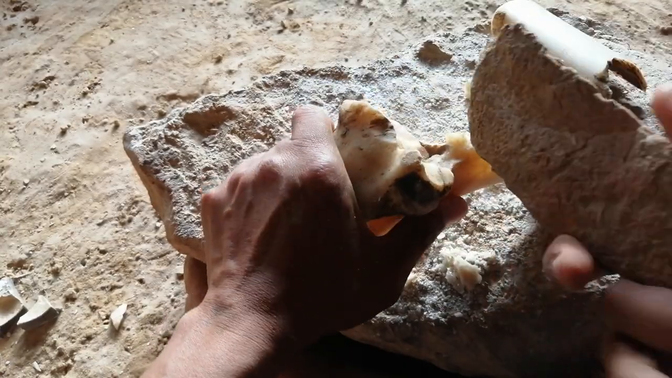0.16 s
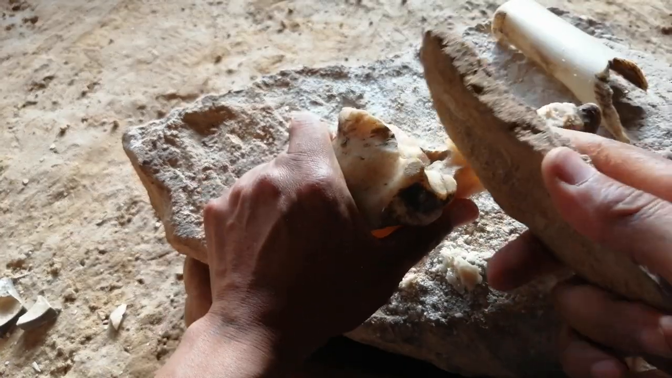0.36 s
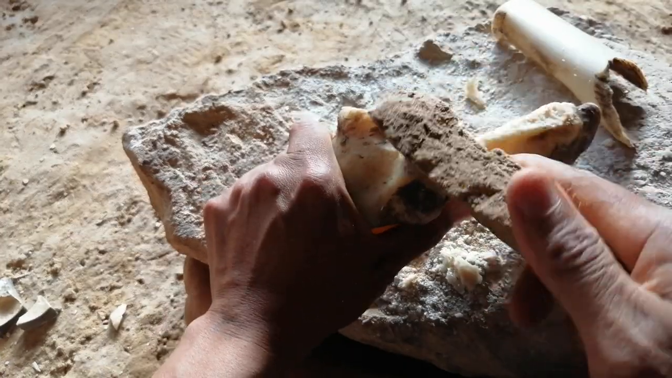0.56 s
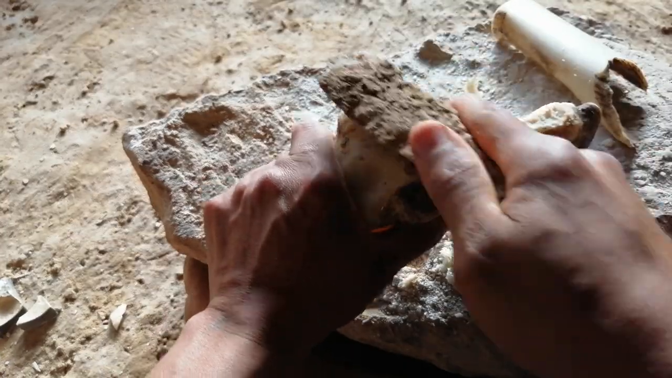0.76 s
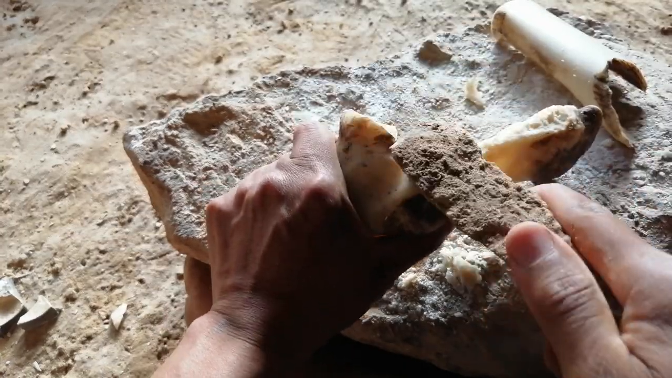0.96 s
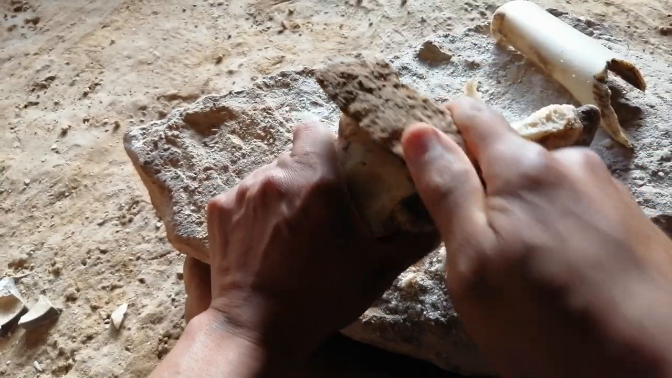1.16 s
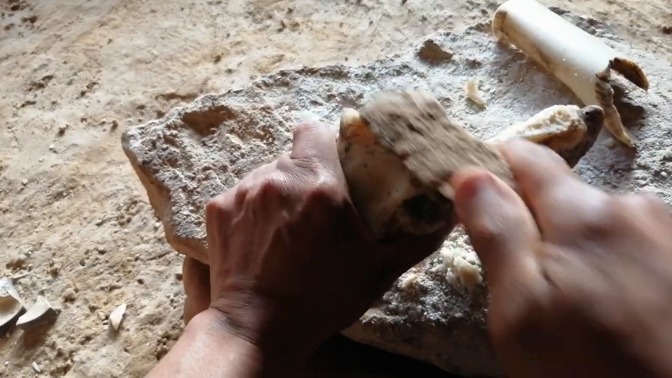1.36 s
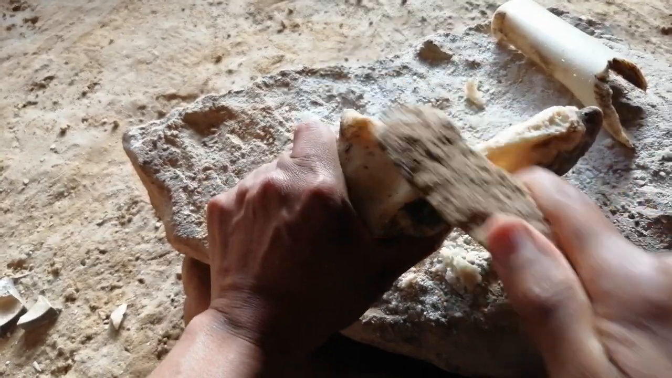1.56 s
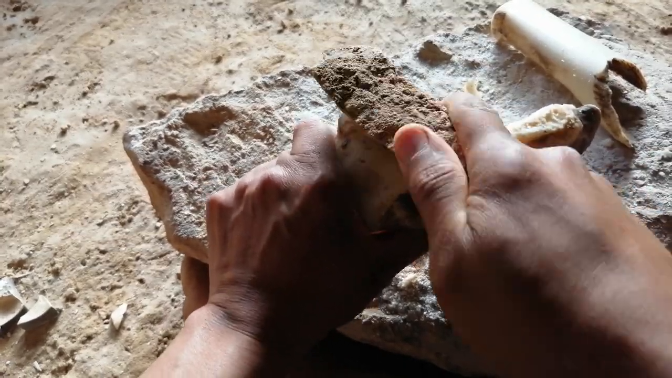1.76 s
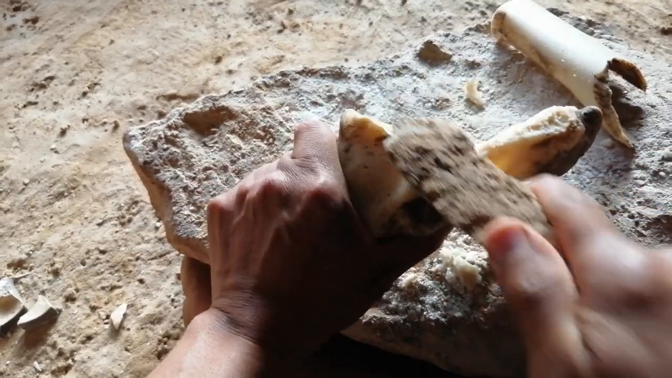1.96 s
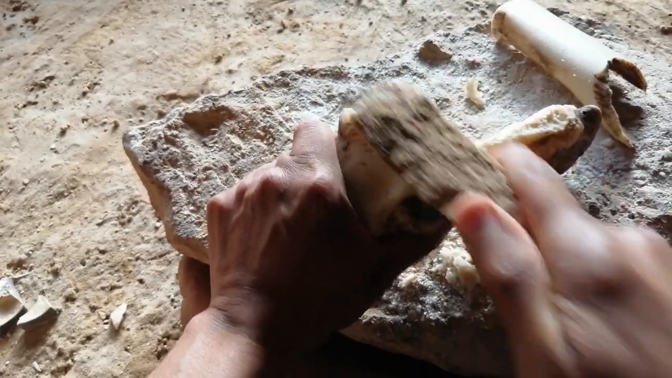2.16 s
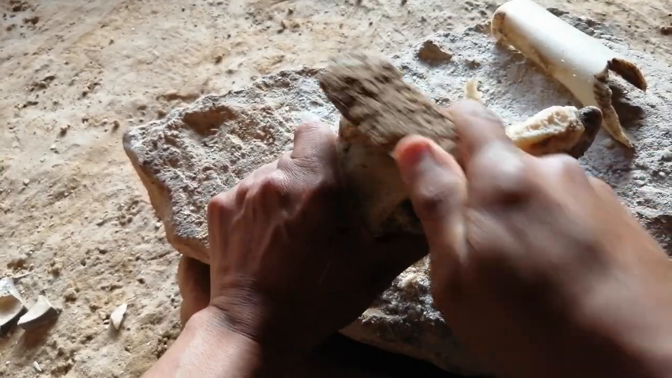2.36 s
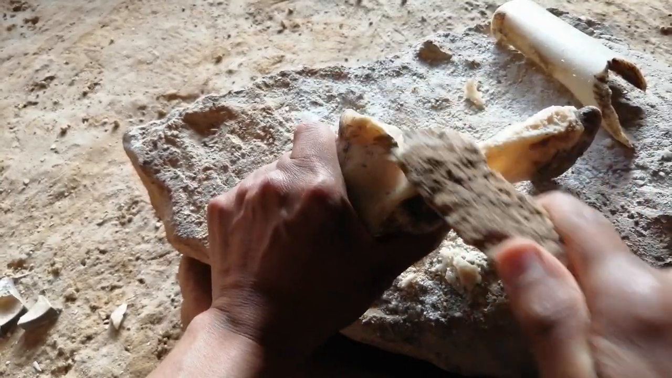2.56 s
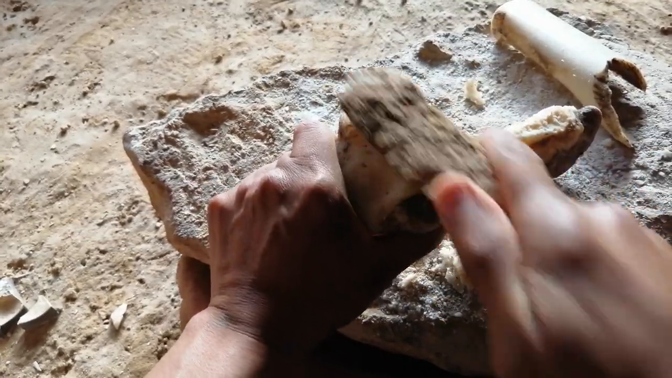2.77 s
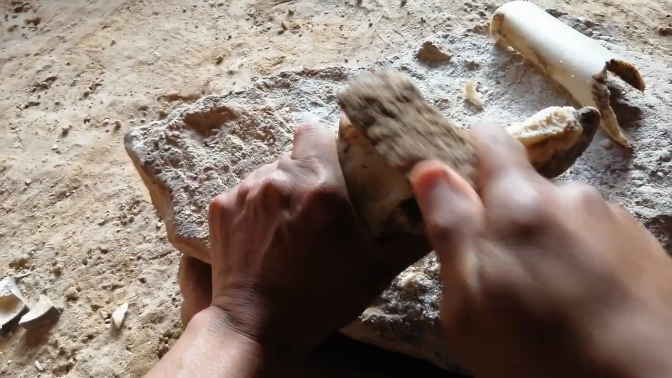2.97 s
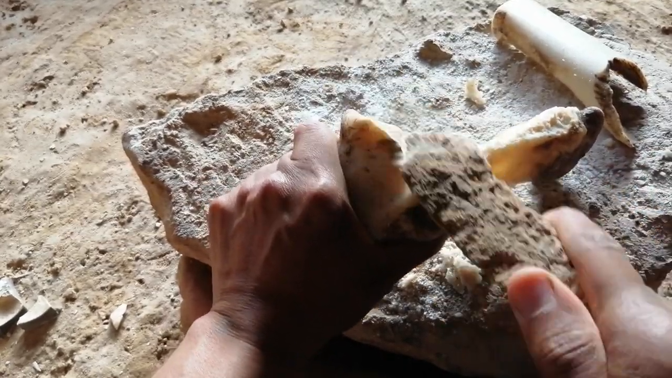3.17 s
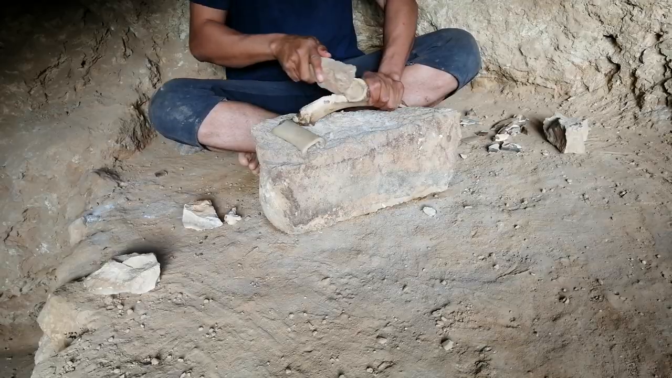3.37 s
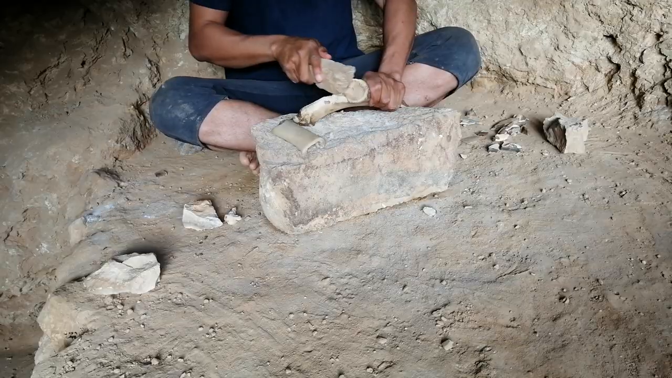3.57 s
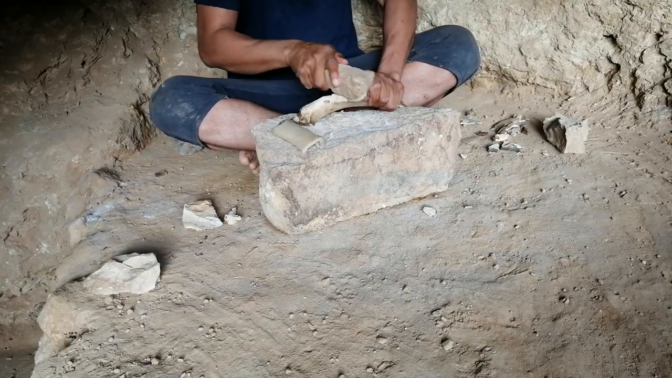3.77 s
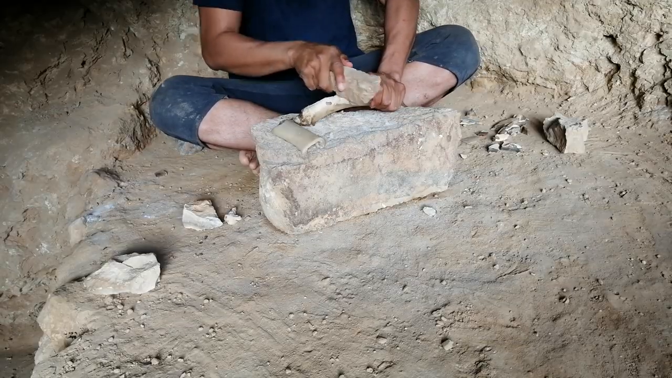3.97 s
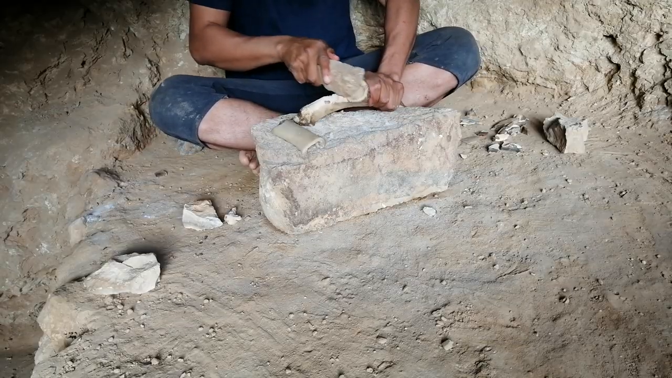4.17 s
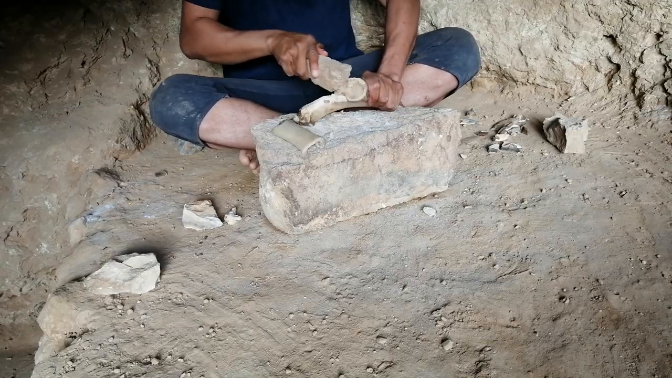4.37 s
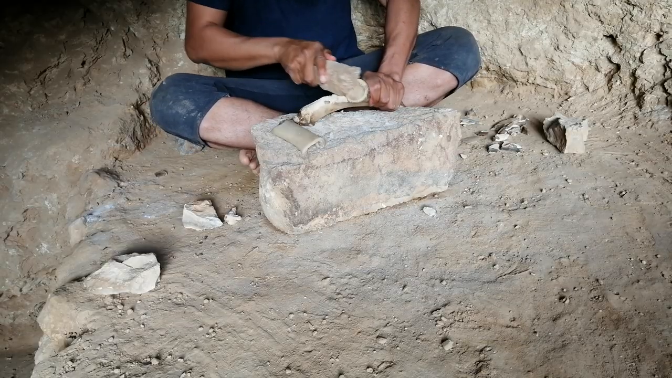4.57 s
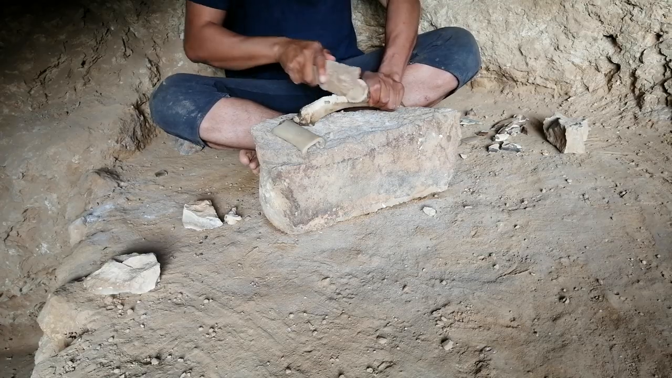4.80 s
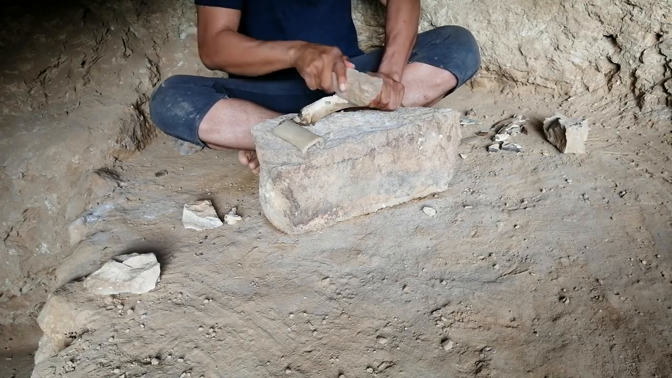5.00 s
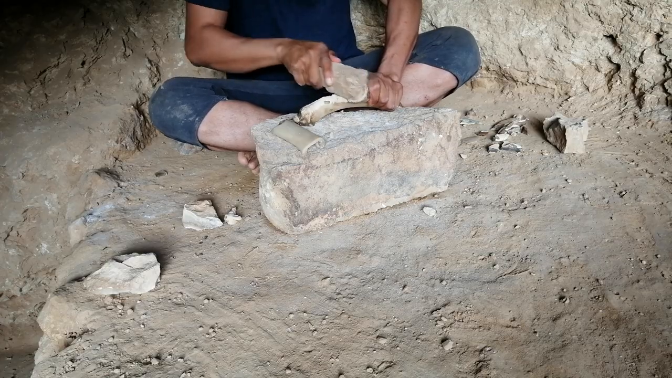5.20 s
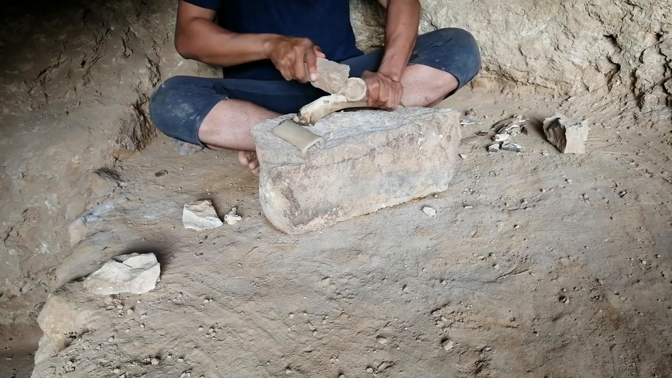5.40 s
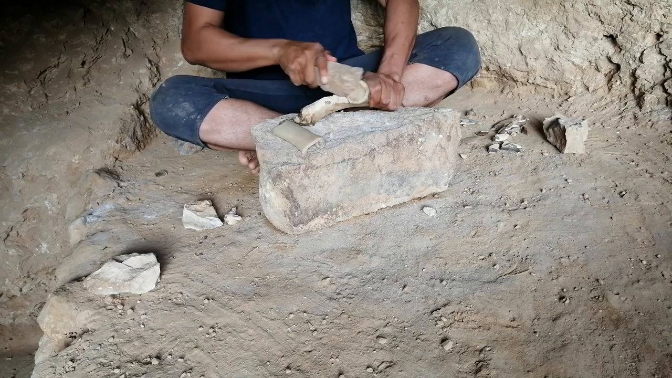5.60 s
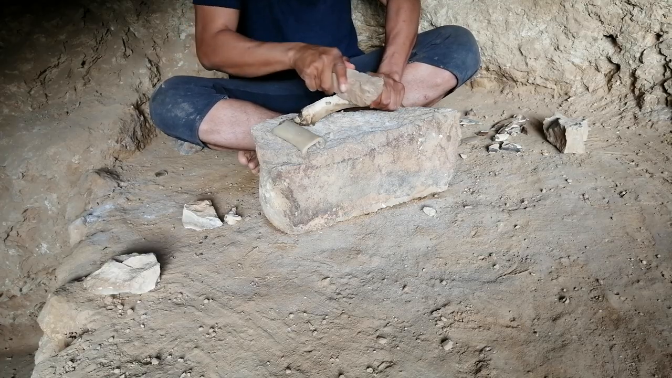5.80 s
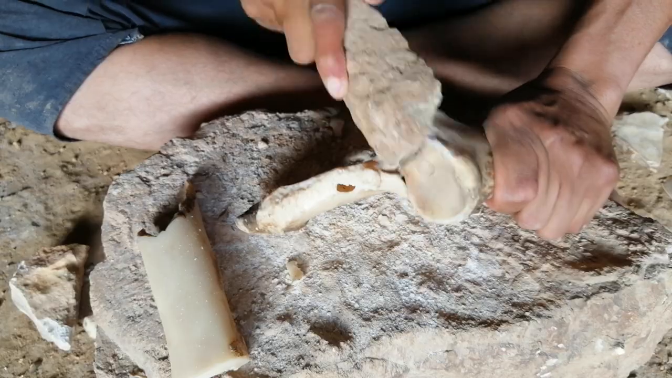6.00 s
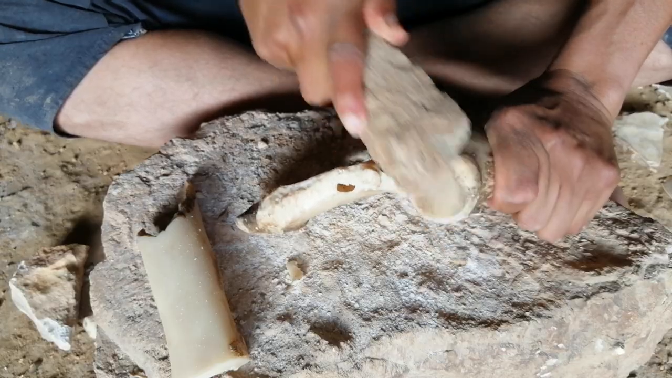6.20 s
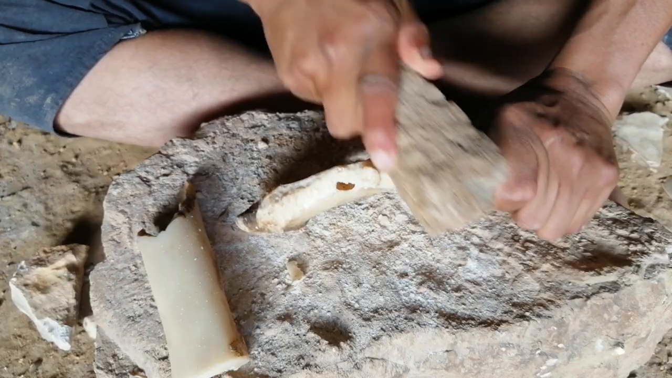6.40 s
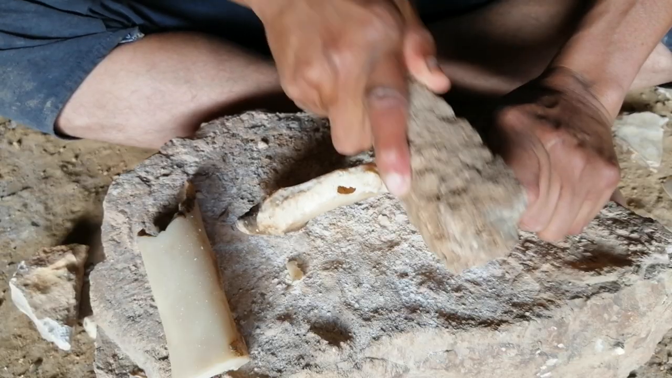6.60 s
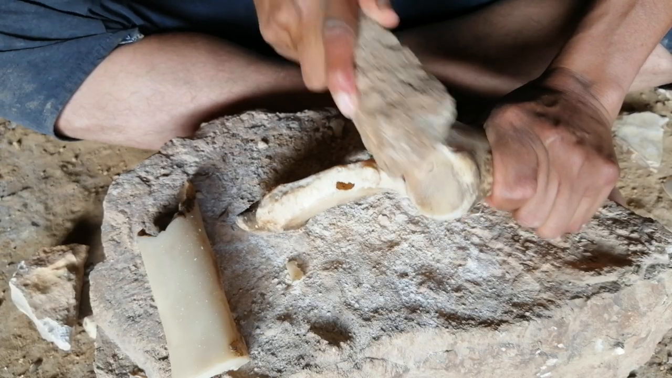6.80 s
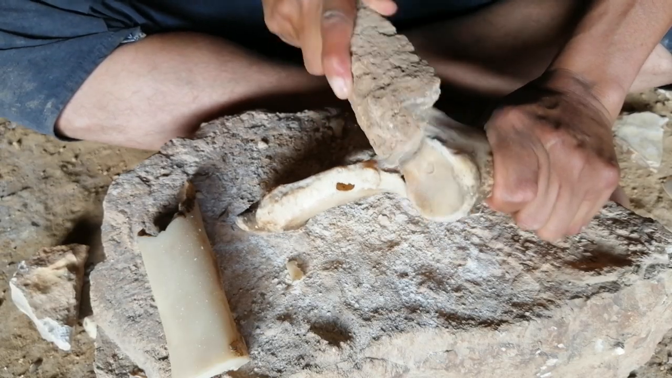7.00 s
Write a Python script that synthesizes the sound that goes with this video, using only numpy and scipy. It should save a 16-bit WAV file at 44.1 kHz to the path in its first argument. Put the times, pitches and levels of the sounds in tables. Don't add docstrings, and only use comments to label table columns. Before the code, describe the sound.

After a quick chirp and soft stone knocks, coarse dry scraping of stone on bone runs in steady, quick to-and-fro strokes inside a rock shelter.

```python
import sys
import numpy as np
from scipy import signal
from scipy.fft import rfft, irfft
from scipy.io import wavfile

SR = 44100
rng = np.random.default_rng(int(sys.argv[2]) if len(sys.argv) > 2 else 0)


def level_to_linear(level):
    exponent = np.asarray(level, float) / 20
    return 10 ** exponent


def dump_mix(stems):
    frames = np.atleast_2d(stems).T
    limited = np.clip(frames, -1, 1)
    pcm = np.round(limited * 32767).astype(np.int16)
    wavfile.write(sys.argv[1], SR, pcm)


N = 310905
T = np.arange(N) / SR

CUTS_S = [
    3.278,
    5.926,
]
# frequency in Hz, level in dB per Hz.
AIR_SPECTRUM = [(15, -30), (25, -6), (59, -7), (72, -9.5), (531, -28), (962, -28.5), (1650, -37),
                (2760, -30.5), (3920, -38), (5430, -31.5), (7510, -40.5), (14800, -40), (16000, -54)]
# peak time in seconds, peak level in dB.
GUSTS = [(3.35, -36), (3.46, -41.5), (3.6, -39), (3.72, -41.5), (3.87, -38.5), (3.99, -35.5), (4.18, -38),
         (4.32, -45), (4.47, -40), (4.62, -34.5), (4.78, -39.5), (4.92, -42), (5.44, -40.5), (5.56, -41),
         (5.68, -39.5), (5.8, -42.5), (5.92, -37)]
# time in seconds, frequency in Hz, level in dB.
CHIRP = [
    [(0.146, 4844, -79), (0.164, 4860, -62), (0.192, 4826, -74), (0.206, 4880, -62), (0.234, 4845, -96)],
]
# peak time in seconds, peak level in dB.
THUMPS = [
    (0.4, -39.5),
    (0.744, -52),
    (.84, -45.5),
]
# hum in dB re stroke, frequency in Hz, width in Hz, coarse bumps in dB.
SLAB = [(-13, 145.4, 96, -20.5), (-6.5, 155.6, 34.5, -34), (-16, 136, 100, -23)]
# slips per second, slip size spread in dB, echo in dB, echo T60 in seconds, level in dB.
PLACES = [(4877, 4, -2.5, 0.12, 2.5), (9000, 3.0, 1, 0.16, 2.5), (6000, 3.5, 0.5, 0.15, 1.86)]
# frequency in Hz, level in dB per Hz.
BODY_NEAR = [(82, -28), (140, 2.5), (217, -6), (342, -2), (451, -9.5), (550, 1), (712, -8), (997, -1.5),
             (1920, -12.5), (2690, -6), (3760, -19), (5170, -9), (11400, -24.5), (14800, -22.5),
             (16000, -31)]
BODY_FAR = [(110, -36), (190, -15.5), (399, -8.5), (508, -5), (696, -7.5), (937, -8), (1380, -14),
            (1970, -14.5), (3310, -15), (4130, -25), (5260, -16), (6100, -21), (11200, -33.5),
            (14600, -34.5), (16000, -40)]
BODY_SIDE = [(82, -43), (140, -11), (363, -8.5), (770, -3), (1840, -9.5), (2080, -5), (2480, -10.5),
             (3090, -7.5), (4240, -19), (5170, -6), (6180, -15.5), (6960, -13), (11200, -26.),
             (14800, -24.), (16000, -46)]
# frequency in Hz, width in Hz, lift in dB.
RING_NEAR = [(312, 70, 1.5), (605, 200, 0.5), (844, 150, 4), (1245, 140, 3), (2206, 94, 6), (2763, 77, 5),
             (3430, 390, 5.5), (7100, 48, 2), (9000, 670, 4)]
RING_FAR = [(511, 62, 6.8), (907, 58, 2.2), (1654, 21, 5.8), (2030, 420, 6), (3290, 330, 3.5),
            (4500, 150, 3.), (5400, 450, 4.5), (7120, 350, 3.)]
RING_SIDE = [(600, 120, 2.4), (895, 27, 1.1), (1350, 14, 4.4), (2080, 42, 3.3), (5020, 74, 3.5),
             (5550, 79, 2.6), (5800, 100, 5.2), (6820, 200, 5.6), (8710, 279.2, 6)]
# frequency in Hz, left minus right in dB.
PORTS = [(2000, 2), (2700, 3.5), (3300, -1), (5100, -12), (5900, -2), (7000, -0.5), (8500, 10.5),
         (10500, 6.5), (13000, -4), (14800, -8.5), (15800, -28)]
# frequency in Hz, left minus right in dB.
LEAN_NEAR = [(60, 4), (150, -0.5), (380, -6), (950, 2), (2380, 0.5), (5980, -2.0), (15000, 0.0)]
LEAN_FAR = [(60, -27), (150, 5.5), (380, -3), (950, -4), (2380, -1), (5980, -5.5), (15000, -3.0)]
LEAN_SIDE = [(60, 16), (150, -5.5), (380, -6), (950, -2), (2380, -3), (5980, -5.5), (15000, -3.0)]
# time at full speed in seconds, hold in seconds, level in dB.
STROKES_NEAR = [(0.868, .07, -31), (1.049, 0.069, -29.5), (1.187, 0.095, -29), (1.395, 0.039, -28),
                (1.511, 0.08, -29), (1.697, 0.054, -29), (1.825, 0.087, -28.5), (2.006, 0.056, -29),
                (2.132, 0.083, -28), (2.324, 0.044, -29), (2.456, 0.072, -28.5), (2.634, 0.073, -29),
                (2.767, .089, -28), (2.952, 0.076, -28), (3.087, 0.09, -27)]
STROKES_FAR = [(3.424, 0.053, -31), (3.541, 0.065, -31), (3.71, 0.018, -25.5), (3.802, 0.055, -29.5),
               (3.961, 0.022, -26.5), (4.056, 0.059, -30), (4.2, .035, -26), (4.32, 0.043, -26),
               (4.462, 0.017, -25.5)]
STROKES_FAR_HARD = [(4.568, 0.053, -26.5), (4.688, 0.05, -27.5), (4.819, .052, -25.5), (4.944, 0.055, -28),
                    (5.081, 0.06, -27), (5.206, 0.064, -28), (5.348, 0.065, -27.5), (5.485, 0.044, -26.5),
                    (5.606, 0.068, -27), (5.745, 0.044, -26.5), (5.878, 0.04, -27)]
STROKES_SIDE = [(6.032, 0.063, -30), (6.17, 0.067, -28.5), (6.304, 0.087, -31.5), (6.44, 0.067, -31.5),
                (6.578, 0.069, -31), (6.705, 0.076, -32), (6.843, 0.063, -30), (6.973, 0.064, -28.5)]
# rise in seconds, fade over hold in dB, low ring in dB, bright grit in dB.
FIRST_WAY = [(.028, -1.5, 0, -1), (0.06, -6.5, 4, 2.5), (0.018, -3., -0.5, 0.), (0.022, -4.5, 2.5, -1.5)]
BACK_WAY = [(0.078, -5.5, 7, 2.5), (0.025, -0.5, 1.5, 0.9), (0.021, -3., 3.5, 1), (0.021, -2.5, 3, -4.5)]
# start in seconds, rise in seconds, stop in seconds,
# level at full speed in dB, level at stop in dB.
HAND_MOVES = [
    (.03, 0.026, 0.13, -74, -75),
    (0.309, 0.043, 0.35, -44, -37.5),
    (.53, .02, 0.54, -72, -66),
    (.68, 0.065, 1.14, -68, -61),
    (.805, .03, 0.83, -44, -39),
    (3.221, 0.034, 3.26, -27.5, -22.5),
    (3.265, 0.032, 3.324, -28.5, -30),
    (5.918, 0.035, 5.96, -29, -27.5),
]
# time in seconds, low ring in dB, bright grit in dB.
RUSTLE = (.36, 2.4, 4.1)
# time in seconds, peak in dB, bright part in dB.
TOUCHES = [(0.324, -58, 3), (0.339, -34, -23), (0.376, -29.5, -19), (0.387, -35, -13.5), (0.66, -67, -2),
           (0.727, -20., -28.), (0.829, -42, -6), (0.86, -34, -1), (.969, -40, -8), (1.641, -41, -27),
           (1.955, -23.5, -24), (5.048, -33, -7.5)]
# time in seconds, peak in dB.
SNAGS_NEAR = [(1.084, -17.5), (1.19, -20), (1.22, -16), (1.264, -18.5), (1.342, -29.5), (1.495, -27),
              (1.509, -21), (1.523, -13.5), (1.582, -27), (1.604, -18.5), (1.662, -15.5), (1.814, -30),
              (1.828, -20.5), (1.861, -20.5), (1.995, -16), (2.141, -16.5), (2.286, -17), (2.312, -18),
              (2.453, -13.5), (2.514, -12), (2.529, -21.5), (2.601, -18), (2.758, -26), (2.779, -16),
              (2.843, -15.5), (2.938, -15.5), (3.074, -21.5), (3.116, -19), (3.17, -14.5), (3.224, -25)]
SNAGS_FAR = [(4.563, -19), (4.684, -21.5), (4.815, -18), (4.992, -19.5), (5.077, -20.5), (5.199, -23),
             (5.341, -20.5), (5.37, -14), (5.399, -16.5), (5.916, -18)]
SNAGS_SIDE = [(6.022, -47), (6.103, -19), (6.173, -26), (6.217, -25.5), (6.294, -58), (6.34, -22),
              (6.365, -20), (6.399, -50), (6.444, -23.5), (6.592, -26), (6.704, -33), (6.714, -25),
              (6.751, -15), (6.845, -22), (6.856, -26), (7.002, -19.5)]
CRUMBLE_DB = [-19.5, -22, -15]


def rms_one(x):
    return x / np.sqrt(np.mean(x ** 2) + 1e-20)


def at_hz(points, hz):
    points = np.array(points)
    return np.interp(np.log(hz + 1), np.log(points[:, 0]), points[:, 1])


def causal(db):
    cepstrum = irfft(db * np.log(10) / 20)
    half = len(cepstrum) // 2
    cepstrum[1:half] *= 2
    cepstrum[half + 1:] = 0
    return irfft(np.exp(rfft(cepstrum)))[:half]


def band(x, lo_hz, hi_hz):
    return signal.sosfilt(signal.butter(2, [lo_hz, hi_hz], "band", fs=SR, output="sos"), x)


def drift(rate_hz):
    noise = rng.standard_normal(N + SR)
    return rms_one(band(noise, rate_hz / 20, rate_hz)[SR:])


def air():
    shared = band(rng.standard_normal(N), 9.4, 190.0)
    noise = shared + band(rng.standard_normal((2, N)), 92.0, 19000.)
    shape = causal(at_hz(AIR_SPECTRUM, np.linspace(0, SR / 2, 4097)))
    shaped = signal.oaconvolve(noise, shape[None], axes=1)[:, :N]
    return level_to_linear(-65 + 1.5) * rms_one(shaped)


def swells(rows, swell_db_per_s, ease_db_per_s):
    levels_db = [db - np.where(T < s, swell_db_per_s * (s - T), ease_db_per_s * (T - s)) for s, db in rows]
    return np.max(levels_db, axis=0)


def rumble(db, lo_hz, hi_hz, channels):
    noise = rms_one(band(rng.standard_normal((channels, N)), lo_hz, hi_hz))
    return noise * level_to_linear(db + 0.92 * drift(39.0))


def wind():
    lull_db = -59
    gusts_db = np.maximum(swells(GUSTS, swell_db_per_s=188, ease_db_per_s=123), lull_db)
    port_gain = level_to_linear(np.array([[-5.], [5.]]))
    at_far = np.searchsorted(CUTS_S, T) == 1
    return rumble(gusts_db, 20.0, 97.0, channels=2) * port_gain * at_far


def insect():
    s, hz, db = np.transpose(CHIRP[0])
    phase = 2 * np.pi * np.cumsum(np.interp(T, s, hz)) / SR
    tone = np.sqrt(2) * level_to_linear(np.interp(T, s, db, -150, -150)) * np.sin(phase)
    return tone * level_to_linear(np.array([[-3.], [3.]]))


def thump():
    thump_db = swells(THUMPS, swell_db_per_s=400., ease_db_per_s=282)
    return rumble(thump_db, 87.0, 163.0, channels=1)


def slab(speed, place, linger_s=0.041):
    keep = np.exp(-1 / (linger_s * SR))
    noise = rng.standard_normal(N) * signal.lfilter([1 - keep], [1, -keep], speed)
    hums = [level_to_linear(db + 18.5) * band(noise, hz - width_hz / 2, hz + width_hz / 2)
            for db, hz, width_hz, _ in SLAB]
    bass_db = np.array([9., 3., 2.5])
    return np.choose(place, hums) + level_to_linear(bass_db)[place] * band(noise, 77.4, 127.4)


def strokes():
    tables = [STROKES_NEAR, STROKES_FAR, STROKES_FAR_HARD, STROKES_SIDE]
    out = []
    for rows, *ways in zip(tables, FIRST_WAY, BACK_WAY):
        for k, (s, held_s, db) in enumerate(rows):
            rise_s, fade_db, low_db, bright_db = ways[k % 2]
            out.append((s - rise_s, rise_s, s + held_s, db, db + fade_db, low_db, bright_db))
    return out


def stroke_gain(stop_db_per_s=910.0):
    out = np.zeros(N)
    for start, rise, stop, full_db, stop_db in [row[:5] for row in strokes()] + HAND_MOVES:
        at = slice(max(int(start * SR), 0), int((stop + .08) * SR))
        t = T[at]
        full = start + rise
        db = np.interp(t, [full, max(stop, full + 0.00087)], [full_db, stop_db])
        db = db - stop_db_per_s * np.maximum(t - stop, 0)
        out[at] += level_to_linear(db) * np.clip((t - start) / rise, 0, 1) ** 1.37
    return out


def bumps(speed, place, per_s=200.0):
    size = level_to_linear(7.4 * np.minimum(rng.exponential(1, N), 3.))
    knocks = (rng.random(N) < per_s / SR) * size * rng.choice([-1, 1], N)
    level_db = np.array(SLAB)[place, 3] + 6.5
    return band(band(rms_one(knocks) * speed * level_to_linear(level_db), 606.0, 1800.0), 380.0, 2000.0)


def all_snags():
    out = list(TOUCHES)
    for rows, crumble_db in zip([SNAGS_NEAR, SNAGS_FAR, SNAGS_SIDE], CRUMBLE_DB):
        out += [(s, db, crumble_db - 0.81 * (db + 23.5)) for s, db in rows]
    return out


def snags(dull_db=16.0, crack_db=14.0, crumble_s=0.012):
    s, peak_db, bright_db = np.transpose(all_snags())
    knock, crack = np.zeros((2, N))
    at = (s * SR).astype(int)
    knock[at + 25] = level_to_linear(peak_db + dull_db)
    crack[at] = level_to_linear(peak_db + bright_db + crack_db)
    decay = signal.lfilter([1], [1, -level_to_linear(-60 / (crumble_s * SR))], crack + 1e-18)
    crumble = decay * rng.standard_normal(N)
    blunt = band(band(knock + 1e-18, 436.0, 2160.0), 310.0, 1900.0)
    return blunt + band(crumble, 3270.0, 20000.0)


def friction(per_s, spread_db, speed):
    start, _, stop, _, _, low_db, bright_db = np.transpose(strokes())
    s, low_db, bright_db = np.c_[RUSTLE, [(start + stop) / 2, low_db, bright_db]]
    born = rng.random(N) < per_s / SR
    size = level_to_linear(spread_db * np.minimum(rng.exponential(1, N), 3.1)) * rng.choice([-1, 1], N)
    flurries = level_to_linear(2.73 * drift(158.0))
    slips = level_to_linear(-4.5) * rms_one(born * size * flurries) * speed
    low = np.interp(T, s, low_db)
    bright = np.interp(T, s, bright_db) + 0.24 * np.log10(speed / 0.085 + .01)
    tilts_db = [low, 0, 0, .5 * bright, bright, bright, 1.5 * bright + 2.04 * drift(9.)]
    below = [0]
    for hz in [600, 1200, 2200, 3600, 6000, 10000]:
        below.append(signal.sosfilt(signal.butter(2, hz, fs=SR, output="sos"), slips))
    below.append(slips)
    return sum((upper - lower) * level_to_linear(tilt_db + 1.6 * drift(74.0))
               for tilt_db, lower, upper in zip(tilts_db, below, below[1:]))


def echoes(echo_db, t60_s, lag):
    t = np.arange(4096) / SR
    common, own = rng.standard_normal(len(t)), rng.standard_normal((2, len(t)))
    lows = 0.64 * (band(common, 23.0, 1780.0) + 0.89 * band(own, 350.0, 1850.0))
    highs = band(own[::-1], 2250.0, 21700.0) * level_to_linear(-20. * t / t60_s)
    tail = (lows + highs) * level_to_linear(-60 * t / t60_s) * (t > .0008)
    tail = level_to_linear(echo_db) * tail / np.sqrt(np.sum(tail ** 2, axis=1, keepdims=True))
    tail[1, max(lag, 0)] = tail[0, max(-lag, 0)] = 1
    return tail / np.sqrt(1 + level_to_linear(2 * echo_db))


def heard(force, body, rings, leans, echo_db, t60_s):
    spot = np.repeat(rng.integers(0, 6, len(force) // 1300 + 1), 1300)[:len(force)]
    hz = np.linspace(0, SR / 2, 1025)
    lean_db = np.where(hz < 2000, at_hz(leans, hz), at_hz(leans, 1700) + at_hz(PORTS, hz))
    out = 0
    for k, lag in enumerate([-1, 0, 2, 3, 4, 5]):
        change = rng.uniform(-0.83, 1, (len(rings), 2))
        db = at_hz(body, hz)
        for (ring_hz, width_hz, lift_db), (detune, boost) in zip(rings, change):
            offset = 2 * (hz - ring_hz * (1 + 0.037 * detune)) / width_hz
            db = db + lift_db * (1 + 0.96 * boost) / (1 + offset ** 2)
        level = np.sqrt(np.sum(band(causal(db), 400, 12000) ** 2))
        colour = np.array([causal(db + lean_db / 2), causal(db - lean_db / 2)]) / level
        path = signal.fftconvolve(echoes(echo_db, t60_s, lag), colour, axes=1)
        out = out + signal.oaconvolve((force * (spot == k))[None], path, axes=1)
    return out[:, :len(force)]


def grinding():
    place, speed = np.searchsorted(CUTS_S, T), stroke_gain()
    per_s, spread_db = np.array(PLACES)[place, :2].T
    force = friction(per_s, spread_db, speed) + bumps(speed, place) + snags()
    ends = [0] + [int(s * SR) for s in CUTS_S] + [N]
    bodies = [(BODY_NEAR, RING_NEAR, LEAN_NEAR), (BODY_FAR, RING_FAR, LEAN_FAR),
              (BODY_SIDE, RING_SIDE, LEAN_SIDE)]
    parts = []
    for a, b, body, (_, _, echo_db, t60_s, level_db) in zip(ends, ends[1:], bodies, PLACES):
        parts.append(level_to_linear(level_db) * heard(force[a:b], *body, echo_db, t60_s))
    return np.hstack(parts) + slab(speed, place)


def scene():
    return air() + wind() + insect() + thump() + grinding()


def low_pass(x):
    return signal.sosfilt(signal.butter(12, 16630, fs=SR, output="sos"), x)


def record(dry):
    mix = signal.sosfilt(signal.cheby2(14, 60, 16350, fs=SR, output="sos"), dry)
    return low_pass(mix)


dry = scene()
out = record(dry)
dump_mix(out)
```